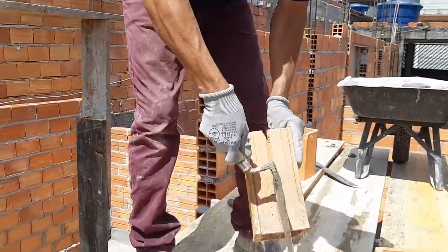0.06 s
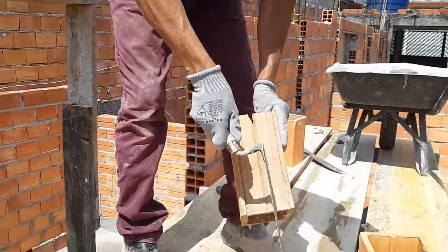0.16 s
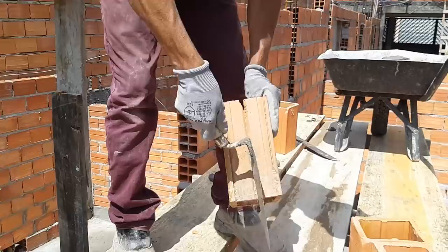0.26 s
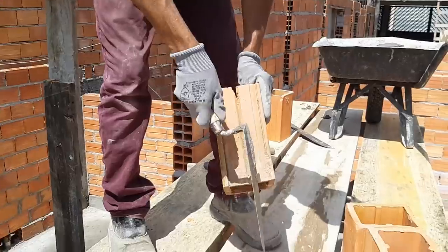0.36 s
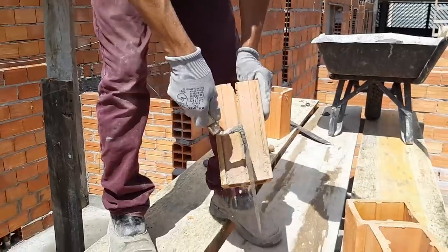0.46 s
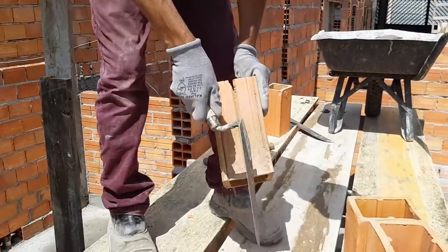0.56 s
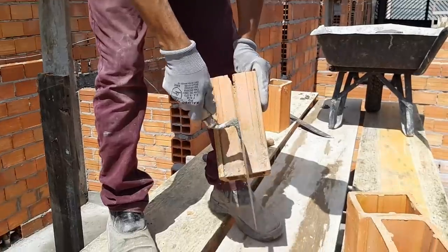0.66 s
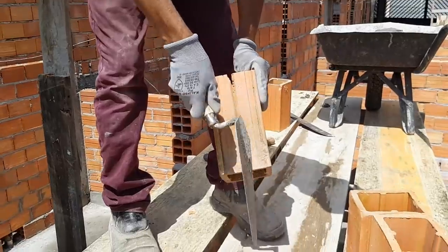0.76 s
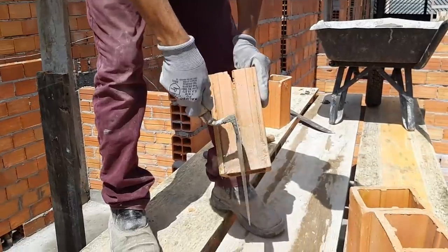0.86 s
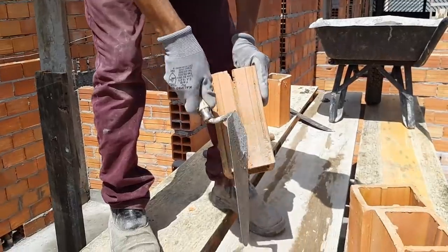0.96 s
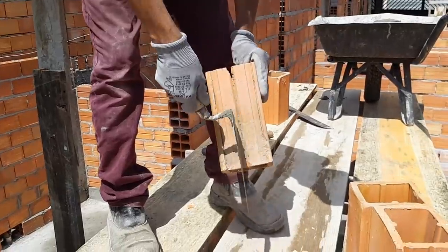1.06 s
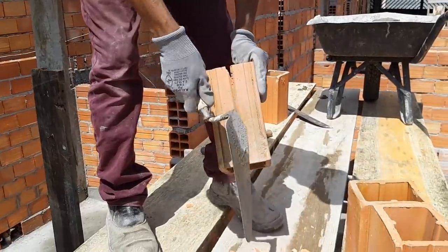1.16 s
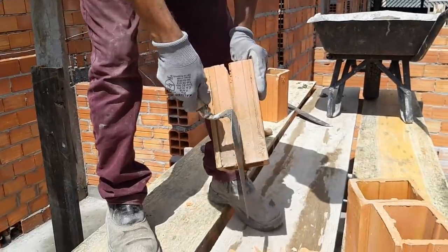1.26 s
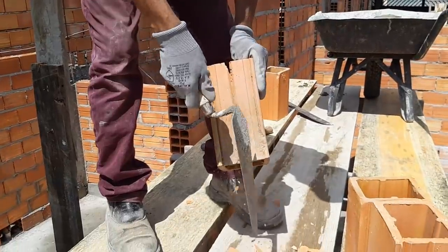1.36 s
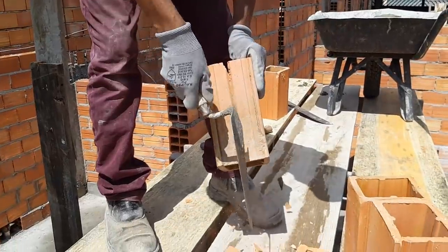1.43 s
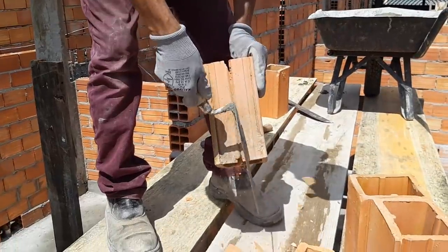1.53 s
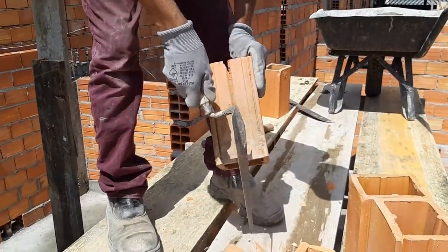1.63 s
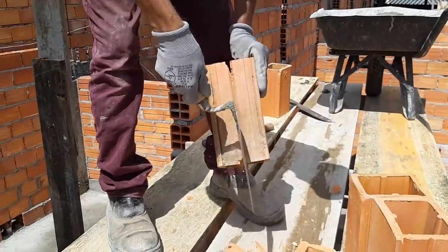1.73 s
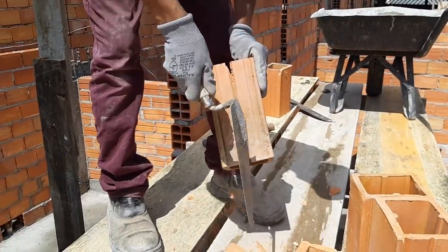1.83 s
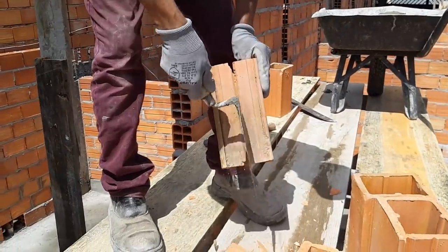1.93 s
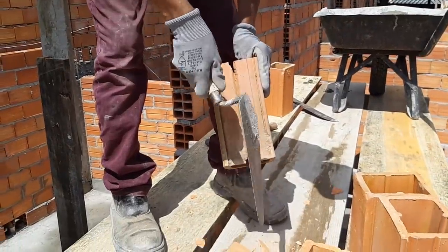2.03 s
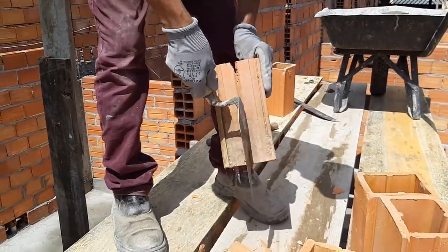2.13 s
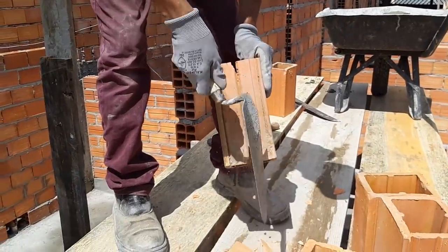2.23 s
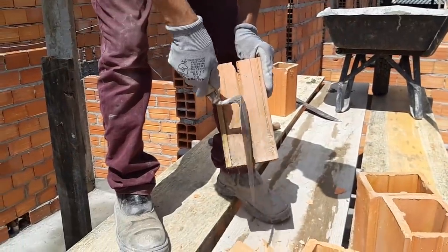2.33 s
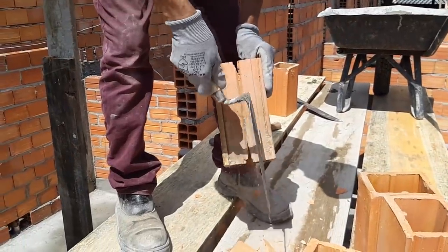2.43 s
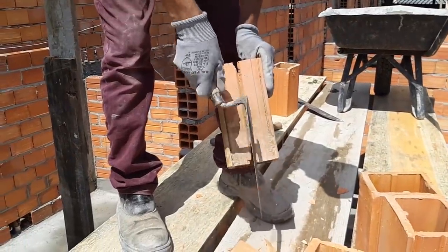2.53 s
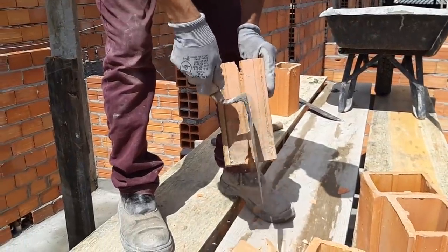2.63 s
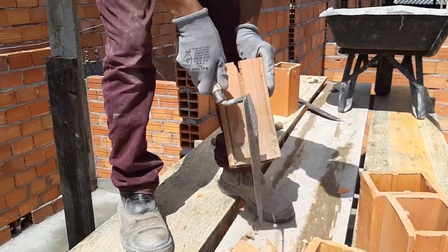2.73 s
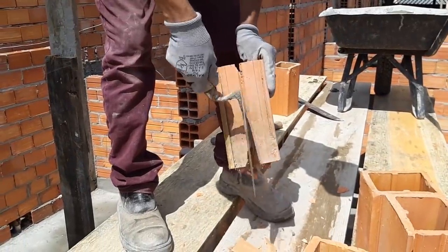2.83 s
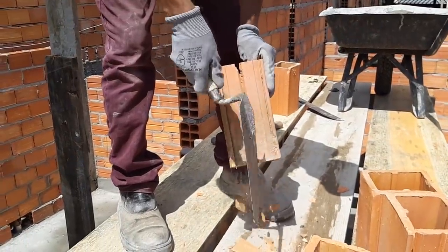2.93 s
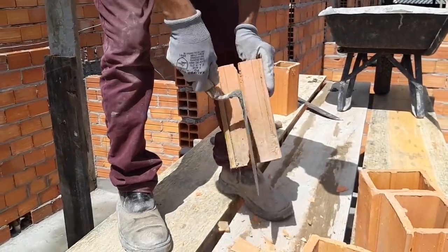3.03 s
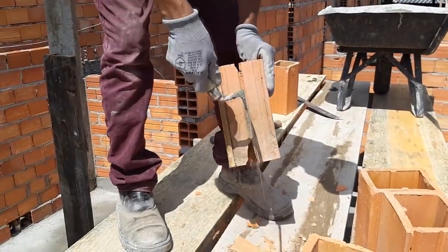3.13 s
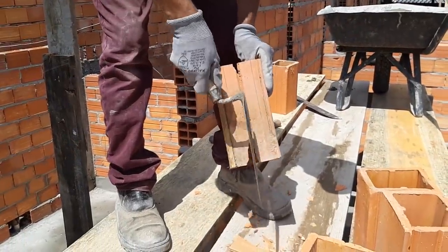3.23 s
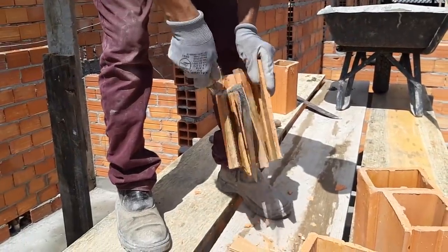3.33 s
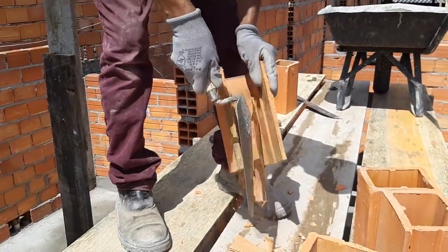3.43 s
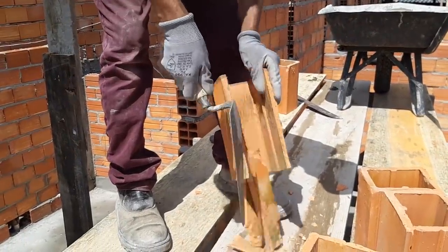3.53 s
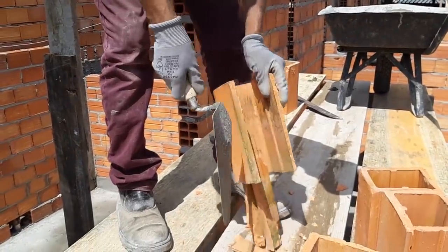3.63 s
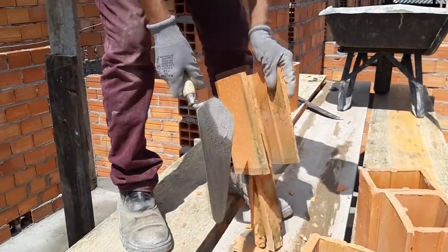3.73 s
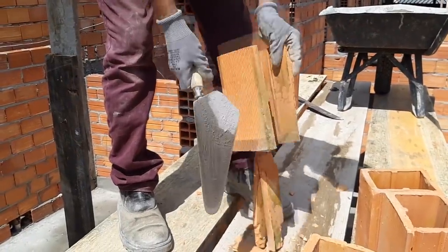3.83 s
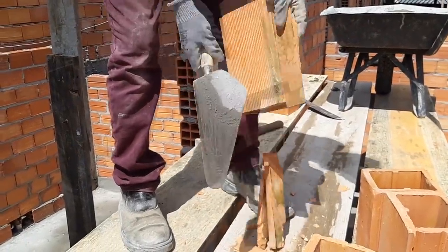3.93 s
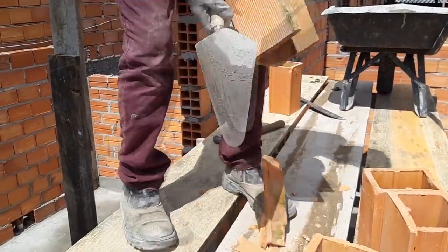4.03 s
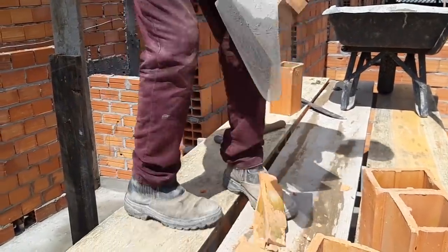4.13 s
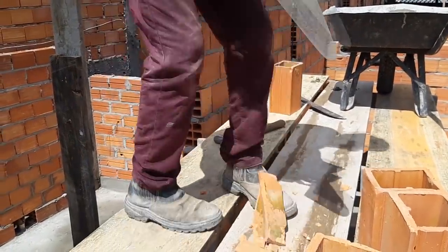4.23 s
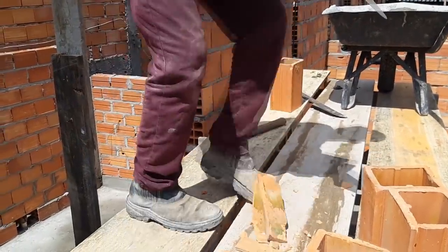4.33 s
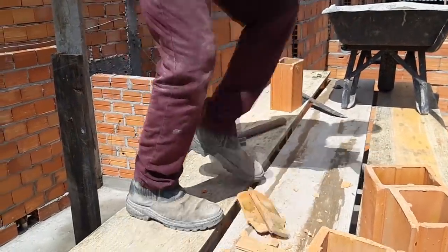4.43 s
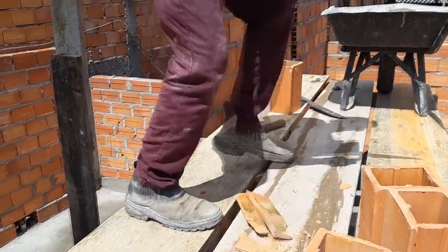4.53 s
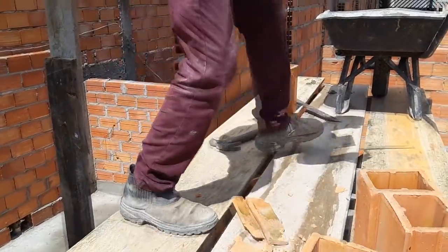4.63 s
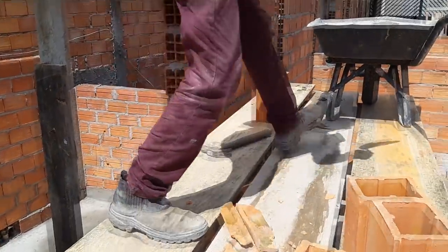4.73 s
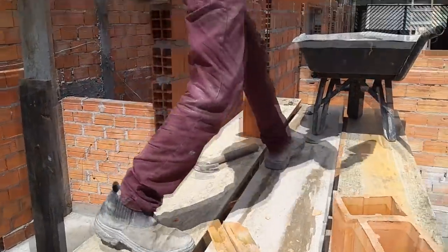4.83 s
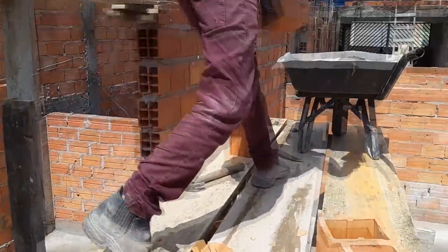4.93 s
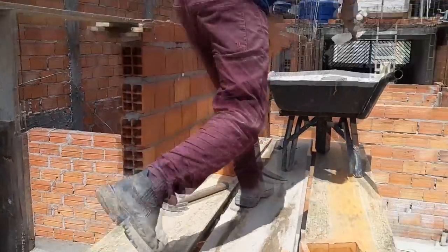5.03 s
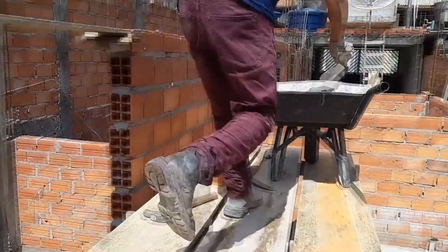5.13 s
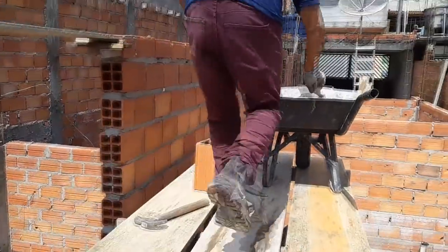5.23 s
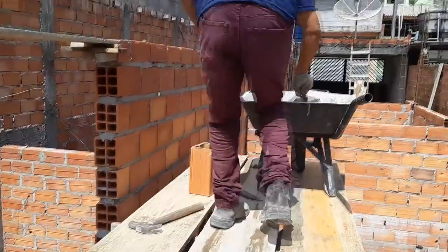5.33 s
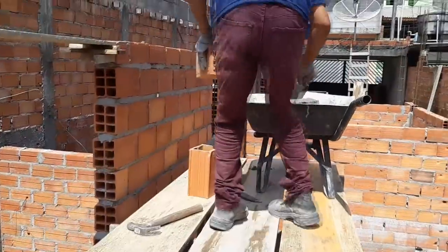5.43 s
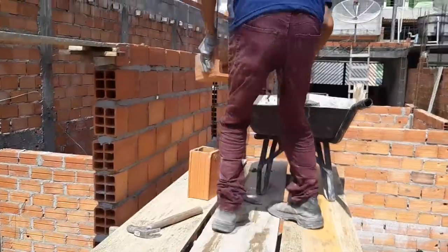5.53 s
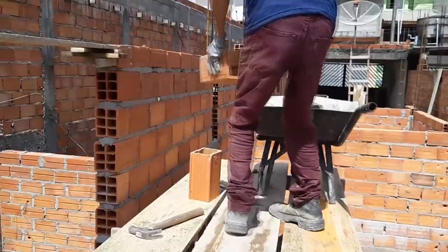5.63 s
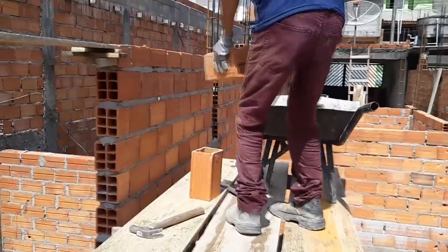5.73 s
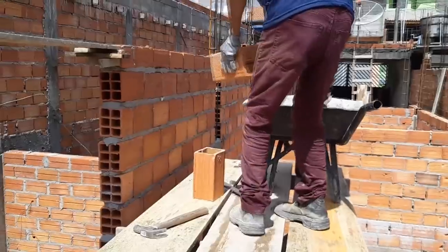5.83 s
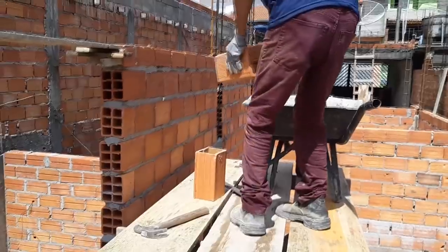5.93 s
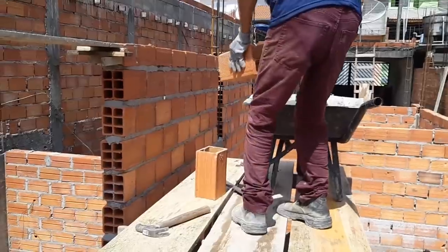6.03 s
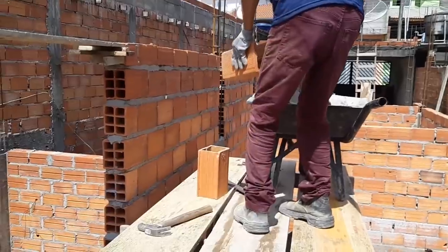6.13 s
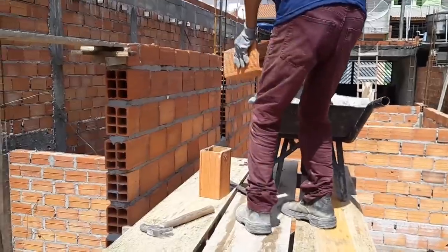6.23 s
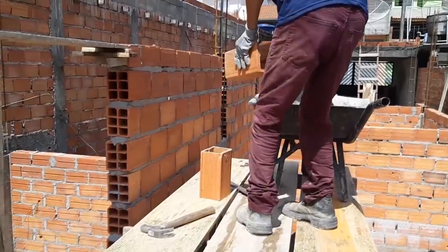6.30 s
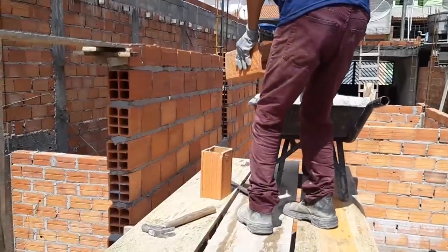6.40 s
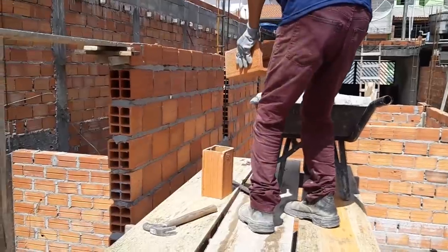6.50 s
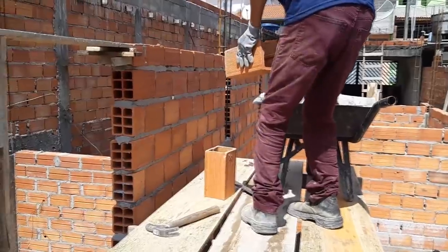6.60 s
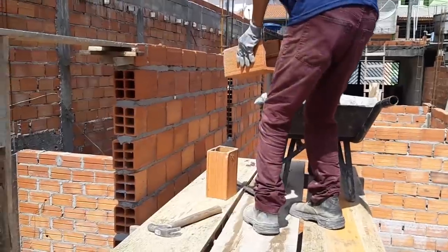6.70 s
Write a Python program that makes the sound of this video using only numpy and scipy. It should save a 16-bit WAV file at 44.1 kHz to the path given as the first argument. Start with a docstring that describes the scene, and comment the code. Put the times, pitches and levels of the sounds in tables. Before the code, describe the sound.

From the start, a steel trowel taps a hollow clay brick close to the microphone, about five times a second. Each tap is a sharp, gritty clink with a light metallic ring. From about 2.3 seconds the note sinks, and small chips knock on wooden planks below. At 3.3 seconds the brick splits with a loud, crumbly crack and a spill of shards, and the offcut thuds onto the boards at 3.5 seconds. It clinks again around 4.1 and 4.4 seconds as crumbs trickle. Boots knock hollowly across the planks, strongest near 4.4 and 5 seconds, then lighter. From about 4.8 seconds until the end, near 6.8, sand scrapes softly under soles and blade in short strokes, with a few small clinks. Light wind brushes the microphone from 6 seconds. A very faint outdoor hiss lies underneath, and brick walls give the impacts a short echo.

```python
"""A steel trowel scores a hollow clay brick on a scaffold with quick taps until it splits.
Each tap rings clay and blade and breaks grit; the note sinks and shortens as the crack grows.
The offcut drops and clinks on the planks, boots knock across the boards, and sand scrapes
under blade and soles. Wind brushes the microphone over a faint site hiss;
unfinished brick walls give a short echo."""
import sys
import numpy as np
from scipy import signal
from scipy.fft import rfft, irfft, next_fast_len
from scipy.io import wavfile

SR = 44100
rng = np.random.default_rng(int(sys.argv[2]) if len(sys.argv) > 2 else 0)


def int16_out(signal):
    """Quantize to a 16-bit WAV file."""
    q = np.round(np.clip(np.atleast_2d(signal).T, -1, 1) * 32767)
    wavfile.write(sys.argv[1], SR, q.astype(np.int16))


N = 298094


def amp(db):
    """dB to gain."""
    return 10 ** (np.asarray(db) / 20)


def unit_rms(x):
    """Scale to rms 1."""
    return x / np.sqrt(np.mean(x ** 2) + 1e-20)


def at_hz(table, hz, column=1):
    """Interpolate a table column over log frequency."""
    rows = np.array(table)
    return np.interp(np.log(np.maximum(hz, 1)), np.log(rows[:, 0]), rows[:, column])


def curve_db(table):
    """Level curve at every sample, -99 dB outside its span."""
    time_s, db = np.transpose(table)
    return np.interp(np.arange(N) / SR, time_s, db, left=-99, right=-99)


def drift(rate_hz):
    """Smooth random wander, rms 1."""
    pole = np.exp(-80 * np.pi * rate_hz / SR)
    slow = signal.lfilter([1], [1, -2 * pole, pole * pole], rng.standard_normal(N // 40 + 2002))[2000:]
    return np.interp(np.arange(N) / 40, np.arange(len(slow)), unit_rms(slow))


def noise(spectrum, channels=2):
    """Steady noise of a given spectrum, rms 1."""
    size = next_fast_len(N)
    gain = amp(at_hz(spectrum, np.fft.rfftfreq(size, 1 / SR)))
    return unit_rms(irfft(rfft(rng.standard_normal((channels, size))) * gain, size)[:, :N])


def butter(x, order, hz, kind):
    """Butterworth filter."""
    return signal.sosfilt(signal.butter(order, hz, kind, fs=SR, output="sos"), x)


def half_octaves(x):
    """Yield (centre in Hz, band of x); signs alternate so neighbours add at the edges."""
    edges_hz = 70 * 2 ** np.arange(0, 8.1, .5)
    for k, (low, high) in enumerate(zip(edges_hz, edges_hz[1:])):
        yield np.sqrt(low * high), (-1) ** k * butter(x, 2, [low, high], "band")


def add(out, start_s, sound):
    """Mix a sound in at start_s."""
    i = round(start_s * SR)
    out[..., i:i + sound.shape[-1]] += sound[..., :N - i]


def ringing(t, hz, db, t60_s):
    """Decaying sines, one per row."""
    hz, db, t60_s = (np.atleast_1d(v)[:, None] for v in (hz, db, t60_s))
    return amp(db - 60 * t / t60_s) * np.sin(2 * np.pi * hz * t)


# Site background. Each row: frequency in Hz, density in dB.
SITE_SPECTRUM = [(15, -37.5), (25, -24), (313, -10.5), (496, -18.5), (669, -10.5), (766, -12), (952, -34),
                 (3230, -25), (3910, -29), (7300, -28.5), (16500, -65)]


def site_hiss():
    """Faint, slightly wavering noise of the building site."""
    return amp(-64 + 0.45 * drift(7.3)) * noise(SITE_SPECTRUM)


# Wind on the microphone. Each row: frequency in Hz, density in dB.
WIND_SPECTRUM = [(12, -45), (20, -21.5), (91, 2.5), (128, -1), (163, 5.5), (216, -7.5), (300, -4.5),
                 (390, -16), (660, -120)]
# Gusts. Each row: time in s, level in dB.
GUST_LEVELS = [(4.7, -70.5), (5.45, -71), (5.93, -59.5), (6.02, -51), (6.07, -58), (6.22, -39.5),
               (6.36, -58), (6.46, -45.5), (6.62, -49.5), (6.76, -54)]


def wind_and_shudder():
    """Low rumble of the microphone, brushed by gusts and shaken by each plank knock."""
    shudder, t = np.zeros(N), np.arange(SR // 2) / SR
    offset_db, t60_s = -35, 0.48
    for start_s, db, *_ in PLANK_KNOCKS:
        add(shudder, start_s, amp(db + offset_db - 60 * t / t60_s))
    gusts = amp(curve_db(GUST_LEVELS) + 3 * drift(18))
    return (gusts + shudder) * noise(WIND_SPECTRUM)


# Wall echo. Each row: frequency in Hz, near-wall t60 in s, near-wall level in dB,
# far-wall t60 in s, far-wall level in dB, side-to-mid ratio.
ECHO_BANDS = [(103.5, 0.27, -19.5, 0.88, -21.5, 0.18), (394, 0.19, -7.5, 0.25, -21, 0.2),
              (1510, 0.19, -9.5, 0.93, -17.5, 1), (5300, 0.34, -10, 0.36, -24.5, 0.99),
              (15100, 0.3, -18.5, 0.09, -23.5, 0.1)]


def wall_echo(x, patterns=6):
    """Echo of the open brick shell: decaying noise per band, changing as the source moves."""
    t, hop = np.arange(SR // 2) / SR, SR // 10
    tails = 0
    for hz, band in half_octaves(rng.standard_normal((patterns, 2, len(t)))):
        near_s, near_db, far_s, far_db, side = (at_hz(ECHO_BANDS, hz, c) for c in range(1, 6))
        decay = sum(amp(db - 60 * t / t60_s) / np.sqrt(t60_s * SR / np.log(1e6))
                    for t60_s, db in [(near_s, near_db), (far_s, far_db)])
        to_stereo = np.array([[1, side], [1, -side]]) / np.hypot(1, side)
        tails = tails + to_stereo @ band * decay
    tails = tails * (1 - np.exp(-t / 0.0015))
    out, padded = np.zeros((2, N + hop)), np.pad(x, (hop, 2 * hop))
    fade = signal.windows.hann(2 * hop, sym=False)
    for k, i in enumerate(range(0, N + hop, hop)):   # overlapping slices cycle through the patterns
        echo = signal.fftconvolve((padded[i:i + 2 * hop] * fade)[None], tails[k % patterns], axes=1)
        out[:, i:i + echo.shape[1]] += echo[:, :N + hop - i]
    return out[:, hop:]


# Port balance. Each row: frequency in Hz, left minus right in dB.
PORT_BALANCE = [(60, 10.5), (110, 10), (200, 0), (380, 2), (700, 1), (1290, 3.5), (2380, 1), (4400, 6),
                (8120, 7.5), (15000, 2)]
# Port phase. Each row: frequency in Hz, left lead in radians.
PORT_PHASE = [(150, 0), (600, .2), (1550, 0.5), (2150, 0.1), (4050, 1.2), (5000, 0.2), (6980, -0.8),
              (8530, 0.0), (10200, -2.1), (11500, -0.4), (12000, -3.5), (13100, -12.9), (14200, -14.8),
              (14800, -19.2), (16400, -18.5)]


def microphone_ports(x):
    """Two ports hear a near source with frequency-dependent level and phase offsets."""
    size = next_fast_len(N)
    hz = np.fft.rfftfreq(size, 1 / SR)
    left = amp(at_hz(PORT_BALANCE, hz) / 2) * np.exp(.5j * at_hz(PORT_PHASE, hz))
    return irfft(rfft(x, size) * np.array([left, 1 / left]), size)[:, :N]


# Plank rumble. Each row: frequency in Hz, density in dB.
RUMBLE_SPECTRUM = [(59, -54.5), (100, -10), (340, 2), (560, -3), (656, -6), (1120, -29.5), (1310, -12),
                   (1500, -26.5), (1950, -53.5), (3300, -120)]
# Load on the planks. Each row: time in s, rumble level in dB.
RUMBLE_LEVELS = [(3.55, -58), (3.78, -77), (4.06, -91), (4.2, -59), (4.63, -44.5), (4.79, -60.5),
                 (5.06, -48), (5.26, -63.5), (5.47, -49), (5.6, -57), (6.2, -59), (6.34, -51.5),
                 (6.76, -53.5)]


def plank_rumble():
    """The boards rumble unevenly under load."""
    return amp(curve_db(RUMBLE_LEVELS) + 2 * drift(18)) * noise(RUMBLE_SPECTRUM, channels=1)[0]


def friction(level_db, spectrum, resonances, lumps_db):
    """Dense sand grains excite the resonances of steel and clay."""
    grains = noise(spectrum) * amp(2.2 * drift(250) + lumps_db * drift(30))
    out = amp(-5.5) * grains
    for hz, width_hz, db in resonances:
        pole = np.exp(-np.pi * width_hz / SR)
        gain = (1 - pole * pole) / 2
        feedback = [1, -2 * pole * np.cos(2 * np.pi * hz / SR), pole * pole]
        ring = signal.lfilter([gain, 0, -gain], feedback, grains)
        out = out + amp(db + 6 + 3.5 * drift(12)) * ring
    return amp(level_db) * unit_rms(out)


# Crumbs and sliding offcut. Each row: time in s, level in dB.
CRUMB_LEVELS = [(3.27, -29), (3.312, -26), (3.43, -73), (3.728, -51), (3.842, -55), (3.95, -70.5),
                (4.1, -54), (4.258, -67), (4.322, -38.5), (4.474, -62), (4.604, -47.5), (4.68, -68.5)]
# Crumb noise. Each row: frequency in Hz, density in dB.
CRUMB_SPECTRUM = [(1240, -45.5), (2100, -4), (3070, -11), (3690, -13.5), (5150, -13), (14000, -28)]
# Crumb resonances. Each row: centre in Hz, width in Hz, relative gain in dB.
CRUMB_RESONANCES = [(3040, 45, -16), (3320, 42, 6.5), (4660, 160, 0.5), (5240, 46, 0.5), (6120, 67, -6.5)]


def crumbs():
    """Crumbs trickle and the offcut slides."""
    return friction(curve_db(CRUMB_LEVELS), CRUMB_SPECTRUM, CRUMB_RESONANCES, lumps_db=2.5)


# Sole and blade strokes. Each row: end of rise in s, hold in s, scrape level in dB, hiss level in dB.
SCRAPE_STROKES = [(4.623, 0.0077, -71, -80), (4.819, .03, -62.5, -71), (4.881, 0.022, -50.5, -67),
                  (4.966, 0.073, -49.5, -67), (5.199, 0.027, -51.5, -58), (5.302, 0.029, -51.5, -68),
                  (5.408, 0.011, -70, -61.5), (5.481, 0.012, -48.5, -64), (5.6, 0.14, -46, -61.5),
                  (5.818, 0.0077, -45.5, -59.5), (5.975, 0.033, -42.5, -55), (6.153, .05, -43.5, -58),
                  (6.236, 0.014, -35, -55), (6.327, 0.053, -39.5, -57), (6.443, 0.0067, -44, -55),
                  (6.59, 0.036, -39.5, -55.5), (6.695, 0.046, -40, -55.5)]
# Scrape noise. Each row: frequency in Hz, density in dB.
SCRAPE_SPECTRUM = [(410, -34), (700, -16.5), (1320, -1.5), (1610, -17.5), (2000, 0.5), (2500, -9),
                   (6520, -5), (8000, -43), (10400, -58), (17600, -120)]
# Scrape resonances. Each row: centre in Hz, width in Hz, relative gain in dB.
SCRAPE_RESONANCES = [(908, 12, 12.5), (1350, 24, -3), (1693, 265, 4.5), (1934, 14, 10), (2330, 210, -3),
                     (2710, 39, 3), (3005, 43, 6.5), (4030, 170, -1.5), (4630, 73, -3), (6670, 310, -17),
                     (7000, 300, 2)]
# Fine hiss. Each row: frequency in Hz, density in dB.
HISS_SPECTRUM = [(4120, -45), (7000, -13.5), (7880, -0.5), (15100, -4), (16100, -15.5), (16500, -35)]


def scrapes():
    """Soles and blade rub over sand, which keeps trickling after each stroke."""
    rise_db_per_s, fall_db_per_s, trickle_db, trickle_db_per_s = 199, 260, -13, 38
    peak_s, hold_s, *levels_db = np.array(SCRAPE_STROKES).T[:, :, None]
    t = np.arange(0, N, 32) / SR
    after_s = t - peak_s - hold_s
    shape_db = -rise_db_per_s * np.maximum(peak_s - t, 0) - fall_db_per_s * np.maximum(after_s, 0)
    tail_db = trickle_db - trickle_db_per_s * after_s
    shape_db = np.where(t > peak_s, np.maximum(shape_db, tail_db), shape_db)
    scrape_db, hiss_db = (np.interp(np.arange(N) / SR, t, np.max(shape_db + db, axis=0))
                          for db in levels_db)
    sand = friction(scrape_db, SCRAPE_SPECTRUM, SCRAPE_RESONANCES, lumps_db=1.1)
    return sand + amp(hiss_db + 1.5 * drift(40)) * noise(HISS_SPECTRUM)


# Plank modes. Each row: ratio to the note, relative level in dB.
PLANK_MODES = [(1.0, 5), (1.36, -6.5), (1.9, -2.5), (2.5, -8), (.72, -11.5)]
# Knocks on the planks. Each row: start in s, level in dB, note in Hz, relative edge level in dB.
PLANK_KNOCKS = [(1.178, -47, 740, 13), (1.372, -35, 776, -15), (1.629, -44, 655, -10),
                (1.737, -33.5, 459, -22), (2.33, -22.5, 426, 14.5), (2.448, -34.5, 737, -21),
                (2.562, -21, 425, 13.5), (2.899, -44, 590, 0), (3.53, -15.5, 321.6, 3.5),
                (3.602, -31.5, 307, -6), (3.77, -38, 476, -23), (3.998, -47, 359, -25.5),
                (4.054, -39.5, 306, -14), (4.109, -24.5, 776, 3), (4.14, -30.5, 340, -19),
                (4.241, -33.5, 390, -13), (4.438, -15, 314.6, 0), (4.611, -32.5, 296, -35),
                (4.66, -32.5, 463, -27), (4.773, -38, 404, -38), (4.798, -43, 331, -19),
                (4.987, -17.5, 361, -16), (5.172, -36, 452, -16.5), (5.196, -33, 374, -17),
                (5.239, -39.5, 381, -22), (5.406, -42.5, 274, -30), (5.554, -40, 294, -19),
                (5.672, -27.5, 301, -13), (6.143, -36.5, 286, -21.5), (6.192, -34.5, 266, -24),
                (6.434, -27.5, 493, -25), (6.6, -37, 250, -18)]


def knocks():
    """Boots and clay hit the planks: wood modes, dull rattle and an edge; low notes last longer."""
    out, t = np.zeros(N), np.arange(SR // 4) / SR
    ratio, mode_db = np.transpose(PLANK_MODES)
    count, ring_cycles, damping_s = len(PLANK_KNOCKS), 25.5, 0.038
    scatter_db = 2 * rng.standard_normal((count, len(ratio)))
    dull = butter(rng.standard_normal((count, len(t))), 2, [230, 700], "band")
    edge = butter(rng.standard_normal((count, len(t))), 2, [800, 2200], "band")
    snap = 1 + amp(-1 - 60 * t / 0.02)   # first contact is louder than the ring
    attack = 1 - np.exp(-t / .001)
    for k, (start_s, db, hz, edge_db) in enumerate(PLANK_KNOCKS):
        t60_s = ring_cycles / hz + damping_s
        wood = ringing(t, hz * ratio, mode_db - 9 + scatter_db[k], t60_s / ratio ** 1.6).sum(axis=0)
        rattle = amp(7 - 60 * t / (1.42 * t60_s)) * dull[k]
        rattle += amp(edge_db + 3 - 60 * t / (0.88 * t60_s)) * edge[k]
        add(out, start_s, amp(db) * (wood + rattle) * snap * attack)
    return out


# Trowel blade modes. Each row: frequency in Hz, relative level in dB, t60 in s.
BLADE_MODES = [(473.5, -14.5, 0.49), (804, -16.5, 0.78), (1003, 1, 0.34), (1250, -2.5, 0.42),
               (1250, -8, 0.88), (1440, 1, 0.41), (1700, -11, 0.13), (2163, 3.5, 0.27), (2580, 6.5, 0.067),
               (2710, -13, 1), (3200, -3.5, 1), (2984, -12.5, 0.73), (3612, -23.5, 1), (3890, -13, .45),
               (4180, -11.5, 0.16), (4700, -11, 0.15), (5700, -18, 0.52), (5770, -26, 0.15),
               (6660, -12.5, 0.22)]


def blade_rings(starts_s, levels_db, choke, tilt_db_per_octave):
    """Struck steel rings, choked until it lifts off; flexing swings each mode's level."""
    out, t = np.zeros(N), np.arange(SR // 3) / SR
    hz, mode_db, t60_s = np.transpose(BLADE_MODES)
    grip_damping = np.cos(np.pi / 2 * t / t[-1]) ** 2
    lift_off = 1 - choke * np.exp(-(t / 0.078) ** 2)
    steel = ringing(t, hz, mode_db + tilt_db_per_octave * np.log2(hz / 2000), t60_s)
    steel *= grip_damping * lift_off
    wobble_depth, wobble_step_s, knots = .45, .03, 24
    ramps = np.maximum(1 - abs(t / wobble_step_s - np.arange(knots)[:, None]), 0)
    for start_s, db in zip(starts_s, levels_db):
        gains = amp(db + 3 * rng.standard_normal(len(hz)))
        wobble = 1 + wobble_depth * rng.standard_normal((len(hz), knots)) @ ramps
        next_tap_s = min([tap[0] - start_s for tap in TROWEL_TAPS if tap[0] > start_s + .01] + [1])
        stop = np.clip((next_tap_s - t) / 0.0026, 0, 1)
        add(out, start_s, gains @ (steel * wobble) * stop)
    return out


def contact_eq_db(hz, thump_db, clink_db, grit_db):
    """Colour of one contact: thump in the bass, clink in the treble, grit on top."""
    return at_hz([(190, thump_db + 42), (400, thump_db + 44.5), (700, 0.0051), (3000, 0),
                  (5000, clink_db + 16.5), (7000, clink_db + 10), (9000, grit_db + 26)], hz)


# Breaking grit. Each row: frequency in Hz, density in dB.
CRACK_SPECTRUM = [(59, -50), (100, -32), (589, -15), (983, -0.5), (1570, -12), (2170, 2.5), (2520, -12.5),
                  (3250, -9.5), (10300, -26.5), (15100, -33), (16500, -49)]
# Grit decay. Each row: frequency in Hz, t60 in s before length_scale.
CRACK_DECAY = [(200, 0.039), (1000, 0.042), (4000, 0.082), (12000, 0.095)]


def clay_blows(modes, starts_s, levels_db, tones, colours, length_scale,
               rise_ms, snap_db, modes_db, crack_db, detune, clumping, width):
    """Each blow sounds its own tones, unevenly struck clay modes and breaking grit; mid and side."""
    out, t = np.zeros((2, N)), np.arange(SR // 7) / SR
    mode_hz, mode_db, mode_t60_s = np.transpose(modes)
    clumps = np.repeat(rng.standard_normal((len(starts_s), len(t) // 30)), 30, axis=1)
    grit = rng.standard_normal(clumps.shape) * np.exp(clumping * clumps)
    snap = amp(snap_db - 60 * t / 0.006)   # first hard contact
    attack = 1 - np.exp(-t * 1000 / rise_ms)
    bursts = []
    for hz, band in half_octaves(grit):
        decay = amp(-60 * t / (length_scale * at_hz(CRACK_DECAY, hz)))
        bursts.append((hz, band * amp(crack_db + at_hz(CRACK_SPECTRUM, hz)) * (snap + decay)))
    for k, colour in enumerate(colours):
        hz = mode_hz * (1 + detune * rng.standard_normal(len(modes)))   # cracks and grip shift the modes
        db = mode_db + modes_db + 3 * rng.standard_normal(len(modes)) + contact_eq_db(hz, *colour)
        body = ringing(t, hz, db, np.minimum(mode_t60_s, 1 / 11))
        clay = np.vstack([body, ringing(t, *tones[k])]) * (1 + snap)
        side_gains = width * rng.standard_normal(len(clay))   # each mode radiates its own way
        ring = np.array([clay.sum(axis=0), side_gains @ clay])
        crack = sum(burst[[k, k - 1]] * amp(contact_eq_db(centre_hz, *colour))
                    for centre_hz, burst in bursts)
        add(out, starts_s[k], amp(levels_db[k]) * (ring + crack * [[1], [width]]) * attack)
    return out


# Offcut modes. Each row: frequency in Hz, relative level in dB, t60 in s (capped in clay_blows).
OFFCUT_MODES = [(1166, -15.5, 0.24), (1877, -8, 0.094), (2554, -9.5, 0.036), (2782, -8, .06),
                (3108, -3, .06), (3467, -5, 0.042), (4090, -2.5, 0.013), (4516, -7, 0.039),
                (5317, -6, 0.029), (6466, -10, 0.069), (7750, -19, 0.042)]
# Shard impacts, plus one grazing tick of the blade at 4.088 s. Each row: start in s, level in dB, ring in Hz,
# then relative levels in dB of ring, thump, clink, grit and blade.
SHARD_HITS = [(1.6016, -22.5, 1037, -7.5, 16.5, -54, -38.5, -32),
              (1.7601, -28.5, 2370, 2.5, -19.5, 2, -47, -47), (1.9201, -28, 6050, -3, -41, -16, 7, -16),
              (2.944, -22.5, 2300, -16, 0.5, -17.5, -30, -37),
              (2.961, -31, 3100, -19, -27.5, -16, -26, -30),
              (2.9757, -24.5, 2080, -14, -22, -31, -31.5, -23),
              (2.9918, -13, 754, -19, -11, -18.5, -27.5, -55),
              (3.303, -16, 2165, -5, -19.5, -23, -27, -39.5),
              (3.3088, -2.5, 2390, -13, -55.5, -5.5, -10.5, -30),
              (3.3297, -26.5, 1460, 2, -38.5, -10, -14.5, -36),
              (3.3563, -4, 1482, -14.5, -33, -25, -18.5, -36.5),
              (3.3624, -15, 3270, -10, -43, -3, -19, -33), (3.394, -22.5, 1680, -8.5, -30, -11, -24, -37),
              (3.3988, -19, 1920, -7.5, -48, -11, -21, -40),
              (3.4492, -19.5, 5070, -14, -16, -11, -14.5, -33),
              (3.4685, -22, 3300, -6.5, -26, -0.5, -26.5, -31),
              (3.5093, -26, 4740, -10, -23, -1.5, -11.5, -26),
              (3.5296, -18.5, 1430, -2.5, 14, -0.5, -12, -56), (3.6038, -31, 1280, -4, -4.5, -7, -26, -34),
              (3.6605, -35, 3700, -12, -25, -4, -11, -26), (3.676, -29, 4350, -10, -35, -5, -12.5, -30),
              (3.727, -49.5, 4000, 1.5, -13, -4.5, -27, -38.5),
              (3.7916, -38, 1525, -6.5, -8, 1.5, -23, -37), (3.8553, -46, 2600, -10, -31.5, 0, -13, -32),
              (3.9976, -48.5, 3330, -4, 1.5, -4, -13, -25), (4.088, -24, 4240, -7, -25, -13, -20, -44),
              (4.093, -7.5, 1847, -18, -18, -4, -30.5, -43.5),
              (4.121, -12.5, 5200, -10.5, -26.5, -4, -23, -34),
              (4.1932, -15, 1455, -14.5, -21, -18, -29, -22),
              (4.3212, -27.5, 5440, -19, -26.5, -10, -20, -26),
              (4.357, -28.5, 1850, -7.5, -22.5, -11, -23, -29),
              (4.4164, -21.5, 4740, -11.5, 8, -13.5, -26.5, -24),
              (4.4455, -7.5, 1848, -15, -20, -19, -39, -61), (4.4586, -18, 3355, -5, -9.5, -19, -45, -46),
              (4.5232, -33, 936, -4.5, -19, -12, -20, -38), (5.449, -31, 714, -8.5, -9, -14.5, -27, -27.5),
              (5.8089, -23.5, 2023, -9.5, -35, -11, -21, -32),
              (5.977, -27.5, 1935, -10, -24, -10, -33, -34)]


def shards():
    """Falling pieces clink on clay, steel and planks, and the blade grazes the brick once just before a blow;
    crumbling contacts last longer."""
    start_s, db, hz, ring_db, thump_db, clink_db, grit_db, blade_db = np.transpose(SHARD_HITS)
    t60_s = np.full_like(hz, 0.064)
    tones = np.transpose([hz, ring_db, t60_s])[:, :, None]
    colours = np.transpose([thump_db, clink_db, grit_db])
    length_scale = np.interp(grit_db, [-40, -10], [0.12, 0.74])[:, None]
    mid, side = clay_blows(OFFCUT_MODES, start_s, db, tones, colours, length_scale,
                           rise_ms=0.47, snap_db=-6, modes_db=-15.5, crack_db=-0.44,
                           detune=0.0083, clumping=0.13, width=0.4)
    return mid + blade_rings(start_s, db + blade_db, choke=0.14, tilt_db_per_octave=-1), side


# Hollow brick modes. Each row: frequency in Hz, relative level in dB, t60 in s (capped in clay_blows).
BRICK_MODES = [(1286, -1.5, 0.036), (1343, -26, 0.02), (1399, -9, 0.023), (1700, -24.5, 0.089),
               (2000, -16, 0.023), (1984, -33, 0.062), (1996, -7, 0.028), (2330, -1, 0.12),
               (2770, -11, 0.036), (3000, -7.5, 0.01), (3211, 8.5, 0.046), (3500, -22, 0.072),
               (4478, 4, 0.0082), (4780, -12, 0.1), (4900, 1, 0.024), (5770, -16, 0.017),
               (6170, -13.5, 0.012), (6320, 5.5, 0.052), (6970, 2.5, 0.25)]
# Trowel taps. Each row: start in s, level in dB, note in Hz, its level in dB, its t60 in s,
# low overtone in Hz, its level in dB, high overtone in Hz, its level in dB, clink in dB, blade in dB.
# Levels after the first are relative.
TROWEL_TAPS = [(0.021, -1, 1017, -18, 0.13, 2534, -11.5, 4630, -10.5, -17, -41),
               (0.225, -8.5, 1009, -9.5, 0.082, 1674, -11, 4070, -13, -18, -31),
               (0.423, -4.5, 998, -18, .18, 1820, -11, 3990, -14.5, -18, -30.5),
               (0.623, -5, 1006, -15.5, 0.081, 2015, -7.5, 4930, -14.5, -18, -33),
               (0.833, -8.5, 1001, -15, 0.13, 2127, -7.5, 4046, -8, -13, -31),
               (1.046, -11.5, 1010, -3.5, 0.061, 1080, -18, 4110, -2, -7, -23.5),
               (1.253, -4, 997, -13, 0.11, 1880, -13.5, 4120, -22, -16, -38.5),
               (1.466, -4, 977, -2.5, 0.052, 2230, -17.5, 4340, -16, -17, -37),
               (1.675, -6.5, 962, -7.5, 0.052, 1350, -16.5, 6280, -10.5, -9.5, -26.5),
               (1.887, -4, 953, -4.5, 0.038, 1316, -16.5, 3970, -18, -12, -33),
               (2.109, -3, 980, -4, 0.024, 1300, -13.5, 5660, -16.5, -12, -32),
               (2.329, -10, 838, -4, 0.058, 1134, -12.5, 4800, -24.5, -6.5, -29),
               (2.561, -10.5, 877, -4.5, 0.057, 2140, -9.5, 3300, -18, -3, -43),
               (2.792, -5, 841, -6, 0.081, 1920, -15.5, 3320, -21.5, -13, -34.5),
               (3.037, -5, 582, -7.5, 0.1, 2350, -17, 4250, -16.5, -12.5, -37.5),
               (3.261, -12, 663, -3, 0.051, 1420, -6.5, 3450, -13, -13.5, -27.5)]


def trowel_taps():
    """The trowel strikes the brick: a note and two overtones over clay modes, grit and blade ring."""
    (start_s, db, note_hz, note_db, note_t60_s,
     low_hz, low_db, high_hz, high_db, clink_db, blade_db) = np.transpose(TROWEL_TAPS)
    overtone_t60_s = np.full_like(start_s, 0.054)
    tones = np.array([[note_hz, low_hz, high_hz], [note_db, low_db, high_db],
                      [note_t60_s, overtone_t60_s, overtone_t60_s]]).transpose(2, 0, 1)
    thump_db = -34 + 2 * start_s   # grows as the brick loosens
    colours = np.transpose([thump_db, clink_db, clink_db - 6])
    mid, side = clay_blows(BRICK_MODES, start_s, db, tones, colours, length_scale=0.87,
                           rise_ms=1, snap_db=-1.5, modes_db=-20.5, crack_db=5,
                           detune=0.024, clumping=0.43, width=0.56)
    return mid + blade_rings(start_s, db + blade_db, choke=0.46, tilt_db_per_octave=3), side


def scene():
    """Stereo mix of near impacts with their echo, scraping, wind and site hiss."""
    tap_mid, tap_side = trowel_taps()
    shard_mid, shard_side = shards()
    mid = tap_mid + shard_mid + knocks() + plank_rumble()
    mid = butter(mid, 3, 170, "high")   # small bodies radiate little bass
    side = butter(tap_side + shard_side, 2, 1400, "high")
    rub = scrapes() + crumbs()
    rub = (rub + 0.069 * rub[::-1]) * amp([[1.1], [-1.1]])   # partly shared by both ports
    air = wind_and_shudder() + site_hiss()
    air = air + .2 * air[::-1]
    return microphone_ports(mid) + side * [[1], [-1]] + wall_echo(mid) + rub + air


def record(dry):
    """Soft limiter, then a steep low-pass."""
    ceiling, stopband_hz = .86, 16750
    rounded = dry / (1 + (dry / ceiling) ** 4) ** .25
    return signal.sosfilt(signal.cheby2(12, 70, stopband_hz, fs=SR, output="sos"), rounded)


dry = scene()
out = record(dry)
int16_out(out)
```